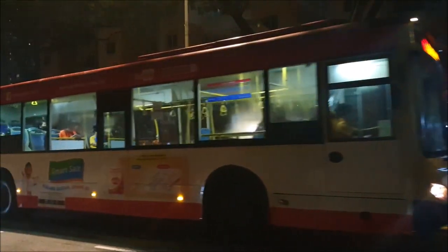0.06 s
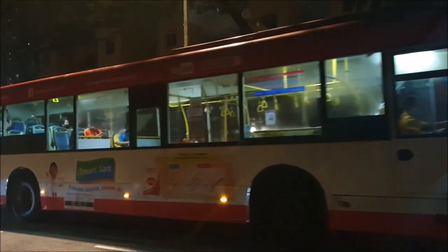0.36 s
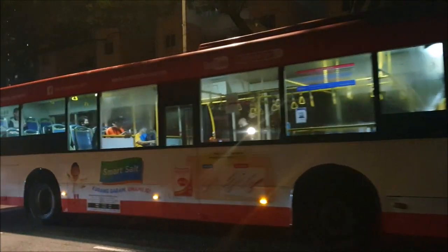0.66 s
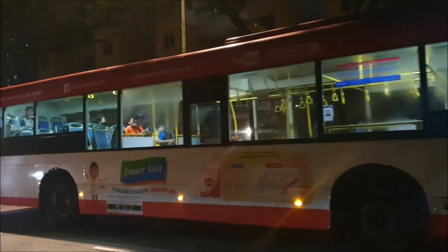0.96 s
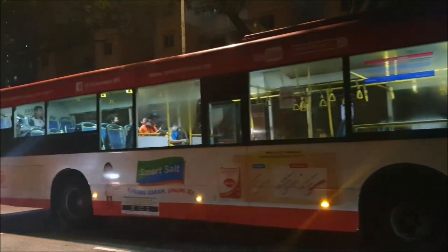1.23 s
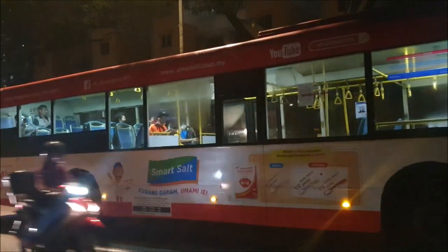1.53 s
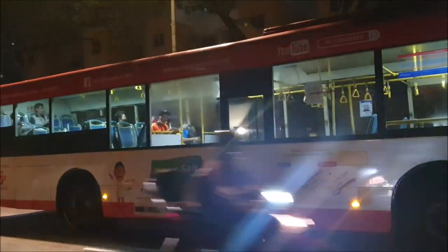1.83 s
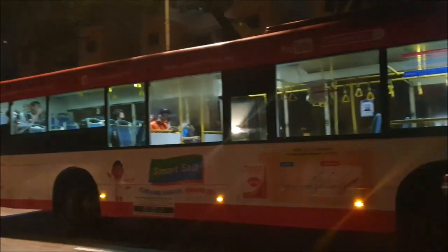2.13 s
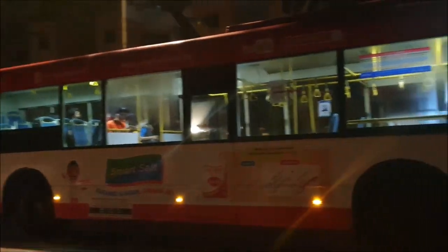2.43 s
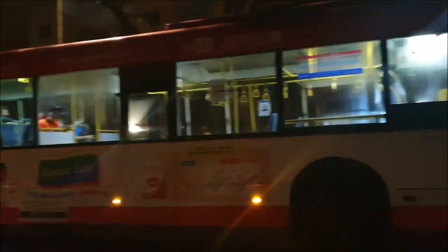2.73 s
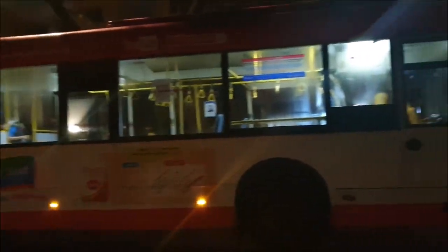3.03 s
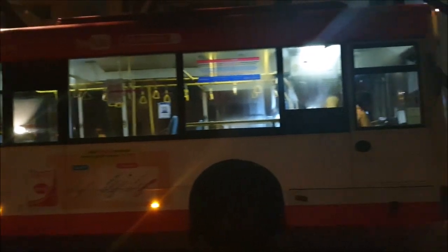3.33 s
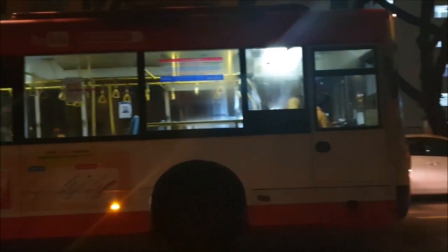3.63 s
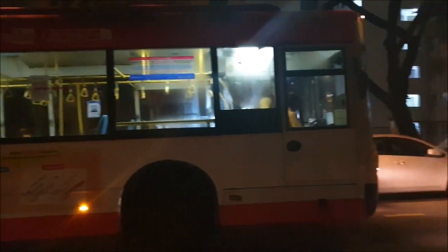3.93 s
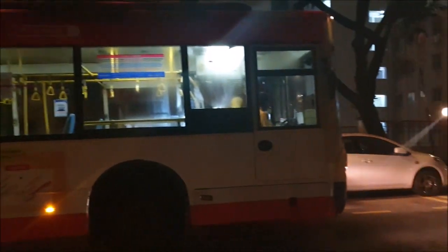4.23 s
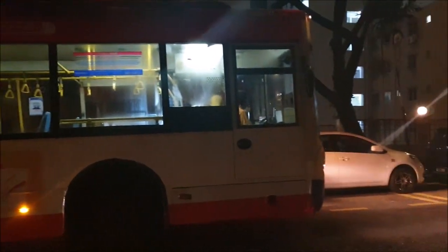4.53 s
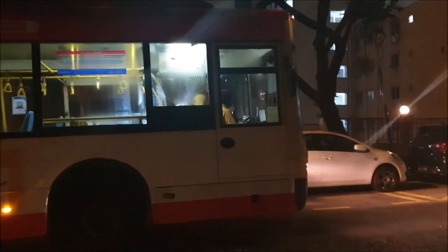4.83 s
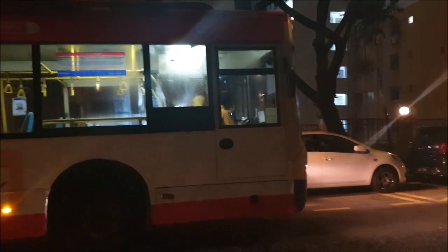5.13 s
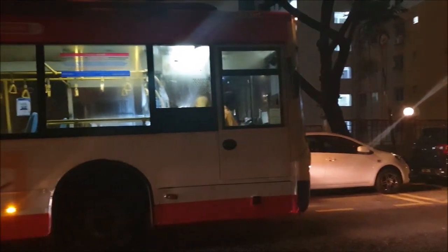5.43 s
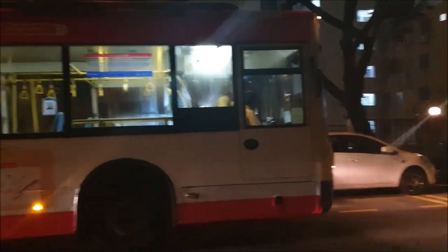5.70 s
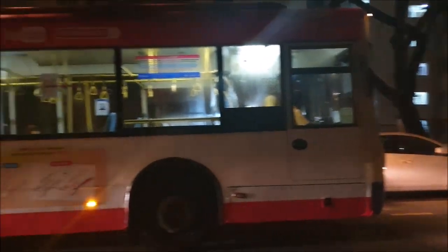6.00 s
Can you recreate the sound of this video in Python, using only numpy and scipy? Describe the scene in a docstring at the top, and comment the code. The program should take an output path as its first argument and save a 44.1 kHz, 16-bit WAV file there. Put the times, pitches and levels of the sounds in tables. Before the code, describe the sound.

A motorcycle thumps past left to right over an idling diesel bus, then the bus's air brakes let out a loud hiss.

```python
"""A low diesel rumble and a thumping motorcycle sound over the wash of night traffic.
A city bus creeps to a halt, its engine idling and its brakes singing faintly, while the motorcycle
passes left to right between it and the kerb: each firing thumps the exhaust, and the chain rattles.
Then the brakes blow off their air: one sharp puff and a longer hiss from under the floor.
House fronts and the side of the bus scatter the sound."""
import sys
import numpy as np
from scipy import signal
from scipy.fft import rfft, irfft
from scipy.io import wavfile

SR = 44100
rng = np.random.default_rng(int(sys.argv[2]) if len(sys.argv) > 2 else 0)


def unload_audio(sound):
    """Save the sound as a 16-bit wav file, at the path given as the first command line argument."""
    columns = np.transpose(np.atleast_2d(sound))
    # keep every value between -1 and 1, then stretch to whole-number steps
    steps = np.round(np.clip(columns, -1, 1) * 32767)
    wavfile.write(sys.argv[1], SR, steps.astype(np.int16))


N = 267246
TIME = np.arange(N) / SR
FREQ = np.fft.rfftfreq(N, 1 / SR)
SOUND_M_PER_S = 343
# the motorcycle rides a straight line and is nearest to the listener at PASSES_S
PASSES_S, BIKE_M_PER_S, NEAREST_M = 2.12, 6.33, 3.3
ALONG_M = BIKE_M_PER_S * (TIME - PASSES_S)  # negative on the left, positive on the right
DISTANCE_M = np.hypot(ALONG_M, NEAREST_M)


def undb(db):
    """Turn decibels into a gain to multiply by."""
    return 10 ** (np.asarray(db) / 20)


def unit(x):
    """Scale a signal to an average (rms) level of 1."""
    return x / np.sqrt(np.mean(x ** 2))


def curves(rows):
    """Join the rows of a table by straight lines in time, one curve per value column."""
    times_s, *columns = np.transpose(rows)
    return [np.interp(TIME, times_s, column) for column in columns]


def across(points):
    """Join (pitch_hz, value) points into a curve over all frequencies, on a log axis."""
    hz, value = np.transpose(points)
    return np.interp(np.log(FREQ + 1), np.log(hz + 1), value)


def colour(x, points):
    """Give a sound the tone outlined by (pitch_hz, level_db) points; the result has level 1."""
    cepstrum = irfft(np.log(undb(across(points))), N)
    # folding makes the filter ring after each hit, never before it
    fold = np.r_[1, np.full(N // 2 - 1, 2), np.zeros(N - N // 2)]
    response = np.exp(rfft(cepstrum * fold))
    return unit(irfft(rfft(x) * response, N))


def band(x, low_hz, high_hz):
    """Keep the part of a sound between two frequencies; the result has level 1."""
    response = 1 / (1 + (FREQ / high_hz) ** 24) - 1 / (1 + (FREQ / low_hz) ** 24)
    return unit(irfft(rfft(x) * response, N))


def ring(x, modes):
    """Let a sound ring an object whose resonances are rows of (pitch_hz, width_hz, level_db)."""
    response = sum(undb(db) * 1j * FREQ * width / (hz ** 2 - FREQ ** 2 + 1j * FREQ * width)
                   for hz, width, db in modes)
    return unit(irfft(rfft(x) * response, N))


def wander(rate_hz):
    """A smooth random wobble of size about 1, changing at up to about rate_hz."""
    return unit(irfft(rfft(rng.standard_normal(N)) / (1 + (FREQ / rate_hz) ** 4), N))


def shimmer(x, modes, rate_hz, depth_db):
    """Metal struck in ever different places: each resonance flickers on its own."""
    return unit(sum(ring(x, [(hz, width, 0)]) * undb(db + depth_db * wander(rate_hz))
                    for hz, width, db in modes))


def noise():
    """Stereo noise: left and right are alike in the bass, less so in the treble."""
    # how alike the two sides are: pitch_hz, likeness (0 to 1)
    likeness = [(60, 0.61), (150, 0.66), (300, 1), (640, 0.55), (1200, 0.53), (4000, 0.26), (15000, 0.074)]
    alike = np.clip(across(likeness), 0, 1)
    mid, side = rfft(rng.standard_normal((2, N)))
    mid, side = mid * np.sqrt(1 + alike), side * np.sqrt(1 - alike)
    return unit(irfft(np.array([mid + side, mid - side]), N))


def fade_out(start_s, end_s):
    """A gain that falls from 1 to 0."""
    return np.clip((end_s - TIME) / (end_s - start_s), 0, 1)


def fade_in(start_s, end_s):
    """A gain that rises from 0 to 1."""
    return 1 - fade_out(start_s, end_s)


def gush(start_s, rise_s, hold_s, fall_s):
    """A gain shaped like escaping air: it rises, holds, and dies as the pressure runs out."""
    falls_at_s = start_s + rise_s + hold_s
    return fade_in(start_s, start_s + rise_s) * fade_out(falls_at_s, falls_at_s + fall_s) ** 2.21


def delayed(x, late_s):
    """One channel heard late; a changing delay bends its pitch."""
    fine = signal.resample_poly(x, 4, 1)
    return np.interp(TIME - late_s, np.arange(4 * N) / (4 * SR), fine)


def arrive(x, left_lead_ms):
    """Sound from the side reaches one ear before the other."""
    left, right = np.broadcast_to(x, (2, N))
    return np.array([left, delayed(right, left_lead_ms / 1000)])


def scatter(x, tail_s, echo_db):
    """Mix a sound with its dense reflections, which fade by 60 dB in tail_s."""
    tail = noise() * undb(-60 * TIME / tail_s)
    tail = tail[:, :SR] / np.sqrt(np.sum(tail ** 2) / 2)
    echoes = signal.fftconvolve(np.atleast_2d(x), tail, axes=1)[:, :N]
    return (x + undb(echo_db) * echoes) / np.sqrt(1 + undb(2 * echo_db))


def firings(rate_hz, spread_db, jitter_s):
    """One uneven pulse per engine firing, and the phase (0 to 1) within each cycle."""
    cycles = np.cumsum(rate_hz) / SR
    starts = np.flatnonzero(np.diff(np.floor(cycles)))
    timing, strength = rng.standard_normal((256, 2))[:len(starts)].T
    starts = starts + (jitter_s * SR * timing).astype(int)
    pulses = np.zeros(N)
    pulses[np.clip(starts, 0, N - 1)] = undb(spread_db * strength)
    return pulses, cycles % 1


def street():
    """Traffic all around: a low rumble that wanders under a smooth far hiss."""
    # tone of distant traffic: pitch_hz, level_db
    traffic_tone = [(20, -12.5), (40, -0.5), (70, -2), (130, -4.5), (220, -5.5), (300, -10), (450, -8.5),
                    (530, -16), (830, -13.5), (1300, -19), (2600, -27.5), (6500, -35), (12000, -35),
                    (15800, -43)]
    wash = colour(noise(), traffic_tone)
    rumble = signal.sosfilt(signal.butter(2, 200, fs=SR, output="sos"), wash)
    swell_db = .6 * wander(5)
    return (wash + rumble * 0.23 * wander(22)) * undb(-44.5 + swell_db)


def ticks():
    """Loose metal parts tap and ring briefly."""
    # small metal taps: start_s, strength_db, pitch_hz, decay_s
    taps = [(2.1505, -35, 12500, 0.004), (2.186, -35, 10500, .004), (2.45, -36, 10660, .003),
            (2.484, -37, 12000, .004), (2.5444, -37, 10980, 0.0034), (5.8282, -40, 12600, 0.0098)]
    out = np.zeros((2, N))
    age = np.arange(SR // 10) / SR
    for start_s, db, hz, decay_s in taps:
        tap = 0.49 * rng.standard_normal((2, len(age))) + 0.18 * np.sin(2 * np.pi * hz * age)
        bright_tap = np.diff(tap * np.exp(-age / decay_s), prepend=0) / 2
        start = int(start_s * SR)
        out[:, start:start + len(age)] += undb(db) * bright_tap[:, :N - start]
    return out


def swish():
    """A short soft hiss swells ahead of the motorcycle."""
    # tone of the hiss: pitch_hz, level_db
    hiss_tone = [(900, -29), (1500, -6), (2100, 7.5), (3300, 3), (4500, -6), (8000, -2.5), (11000, 2),
                 (15000, -3)]
    swell = gush(1.117, rise_s=0.16, hold_s=0.12, fall_s=.24)
    left_right_db = np.array([[-45], [-41]])
    return colour(noise(), hiss_tone) * swell * undb(left_right_db)


def brake_squeal():
    """The brake linings sing thinly and unsteadily while the wheels still turn."""
    # squeals: start_s, end_s, pitch_hz, start_level_db, swell_db_per_s
    squeals = [(0, 0.65, 4590, -65, -16), (.15, 1.5, 14820, -72, 10)]
    edge_s = .12
    out = 0
    for start_s, end_s, hz, db, swell in squeals:
        pitch_hz = hz * (1 + .0006 * wander(40))
        tone = unit(np.sin(2 * np.pi * np.cumsum(pitch_hz) / SR))
        grip = fade_in(start_s, start_s + edge_s) * fade_out(end_s - edge_s, end_s)
        level_db = db + swell * (np.minimum(TIME, end_s) - start_s) + 1.5 * wander(15)
        out = out + tone * grip * undb(level_db)
    return scatter(out, tail_s=0.43, echo_db=2)


def bus_diesel():
    """The bus idles: lumpy firings boom through its body, with a light injector knock and sizzle."""
    # boom of the bus body: pitch_hz, level_db
    body_tone = [(18, -29), (30, 2), (43, -13), (60, 11), (90, 10), (120, -3.5), (160, -41), (190, -16),
                 (230, -1), (300, -9.5), (450, -20.5), (1000, -49)]
    idle_hz = 29.76
    pulses, phase = firings(idle_hz * (1 + .005 * wander(2)), spread_db=1.2, jitter_s=.0003)
    body = scatter(colour(pulses, body_tone), tail_s=.3, echo_db=-11)
    knock_modes = [(226.5, 8.6, -1.5), (430, 54, -22.0), (850, 300, -28), (1660, 440, -34.5)]
    knock = ring(noise() * np.exp(-phase / 0.067), knock_modes)
    spray = noise() * np.exp(-phase / 0.5) * undb(2 * wander(25))
    sizzle = colour(spray, [(3000, -17), (6500, 8.5), (8500, -9), (12000, 12.5), (15500, 2)])
    sizzle_db = -70.5 + 7.5 * fade_in(4.7, 6)  # louder once the bus stands
    return body * undb(-45) + knock * undb(-58.5) + sizzle * undb(sizzle_db)


def bus_rolling():
    """Tyres and panels rumble as the bus draws level, then die away as it halts."""
    rumble = colour(noise(), [(25, -9), (50, -2.5), (130, 0.5), (230, 3.5), (400, -9), (550, -16.5),
                              (860, -8.0), (1000, -12), (1400, -23), (2500, -38), (5000, -60)])
    return rumble * undb(-37.5) * fade_in(0, 0.74) * fade_out(0.38, 4.53)


def bearing():
    """Where the motorcycle is: -1 far left, 0 straight in front, 1 far right."""
    return ALONG_M / DISTANCE_M


def passing(level_db, coming_db, going_db):
    """Gain of one motorcycle part: it falls with distance and differs when coming and going."""
    side = bearing()
    aim_db = np.where(side < 0, coming_db, going_db) * side ** 2
    screen_db = -14.5 * fade_out(0, 0.65)  # traffic is in the way at first
    return undb(level_db + aim_db + screen_db) * NEAREST_M / DISTANCE_M


def road_echo(x):
    """Add the engine's bounce off the road, clearer from behind: the rasp climbs as it leaves."""
    engine_ahead_m, engine_gap_m, longest_detour_m = 0.84, 2.59, 0.377
    detour_m = longest_detour_m * engine_gap_m / np.hypot(ALONG_M + engine_ahead_m, engine_gap_m)
    echo = np.array([delayed(channel, detour_m / SOUND_M_PER_S) for channel in x])
    gain = undb(-12.5 + 3 * bearing())
    return (x + gain * echo) / np.sqrt(1 + gain ** 2)


def bus_side_echo(x):
    """The side of the bus mirrors the exhaust until the motorcycle has passed its front."""
    bus_gap_m = 1.617
    detour_m = np.hypot(ALONG_M, NEAREST_M + 2 * bus_gap_m) - DISTANCE_M
    echo = np.interp(TIME - detour_m / SOUND_M_PER_S, TIME, x)
    return echo * undb(-13) * fade_out(2.3, 2.6)


def chain_squeaks():
    """Dry links catch for a moment and chirp roughly."""
    # chirps: peak_s, level_db, pitch_hz, half_length_s
    chirps = [(1.15, -53, 9900, .05), (1.5, -53, 13330, .025), (1.74, -51, 13250, .03),
              (1.757, -51, 6400, 0.036), (1.768, -53, 4600, 0.05), (2.03, -53, 6260, .012),
              (2.296, -45, 6148, 0.012), (2.336, -44, 6070, 0.019), (2.373, -46, 6170, 0.02)]
    waver, grit = .015 * wander(300), undb(4 * wander(150))
    out = 0
    for peak_s, db, hz, half_length_s in chirps:
        swell = np.exp(-((TIME - peak_s) / half_length_s) ** 2)
        tone = np.sin(2 * np.pi * np.cumsum(hz * (1 + waver)) / SR)
        out = out + undb(db) * swell * tone
    return out * grit


def chain(phase):
    """Links strike the toothed wheels in gritty bunches; the ringing drops in pitch as it passes."""
    # rattle of the links: pitch_hz, level_db
    rattle_tone = [(2000, -19.5), (3000, -1.5), (4160, -1.5), (5050, -7.5), (6800, -1), (7600, -0.5),
                   (8630, -11), (9780, 4), (11500, 0), (13000, -4), (14600, -4), (15800, -8)]
    # resonances of the chain and its wheels: pitch_hz, width_hz, level_db
    chain_modes = [(4570, 180, -4), (6190, 160, -0.5), (7420, 390, -1), (9640, 200, -2), (11100, 140, -8),
                   (12100, 150, -0.5)]
    grit = undb(1.6 * wander(220))
    links = noise() * grit * unit(8.3 + np.exp(-phase / 0.11))
    rattle = colour(links, rattle_tone) * passing(-43.5, coming_db=-1.1, going_db=3.4)
    ringing = shimmer(links, chain_modes, rate_hz=25, depth_db=3.5)
    late_s = (DISTANCE_M - NEAREST_M) / SOUND_M_PER_S
    ringing = np.array([delayed(channel, late_s) for channel in ringing])
    return rattle + ringing * passing(-49, coming_db=-0.5, going_db=6)


def tappets(firing_hz):
    """The small parts that push the valves tick unevenly once a cycle and ring the valve cover."""
    # resonances of the valve cover: pitch_hz, width_hz, level_db
    cover_modes = [(7900, 820, -3), (10860, 700, 1), (11700, 900, -2), (13500, 1200, -3)]
    strokes, _ = firings(firing_hz, spread_db=2.5, jitter_s=.001)
    rise_s = 0.0044
    age = TIME[:SR // 20] / rise_s
    taps = signal.fftconvolve(strokes, age * np.exp(-age))[:N]
    ringing = shimmer(noise() * taps, cover_modes, rate_hz=30, depth_db=3)
    return ringing * passing(-49.5, coming_db=-16, going_db=3.7)


def clatter(surge):
    """Firings shake the engine; from behind, its casing rasps higher."""
    # tone of the shaking engine: pitch_hz, level_db
    engine_tone = [(240, -20.5), (400, 2), (515, -5.5), (693, -2.5), (951, -3.5), (1250, -8), (1420, -4),
                   (1600, -8.5), (1830, -6.5), (2950, -16), (5000, -18), (6500, -31), (11000, -120)]
    shake = noise() * surge * undb(0.96 * wander(35))
    engine = colour(shake, engine_tone) * passing(-41, coming_db=3.85, going_db=-0.81)
    casing = ring(shake, [(1075, 220, 4.5), (1383, 140, 3), (1790, 910, -0.5), (2230, 130, -5)])
    casing *= passing(-42, coming_db=-14, going_db=1.3)
    # the open side of the engine sweeps past
    flare_db = 2.5 * gush(1.81, rise_s=.08, hold_s=0.054, fall_s=0.34)
    return road_echo(engine + casing) * undb(flare_db)


def exhaust(pulses, surge, firing_hz):
    """Each firing thumps, rings pipe and silencer and leaves a puff; from behind it pops, then blurs."""
    # tones of the pipe's hum, boom, bark and sharp pop: pitch_hz, level_db
    hum_tone = [(60, -73.5), (92, -24), (112, 5), (128, -7.5), (150, -2.5), (250, -53)]
    boom_tone = [(60, -64.5), (90, -16), (120, -46.5), (142, 5), (165, 1.5), (182, -0.5), (212, -9),
                 (260, -15.5), (500, -69.5)]
    bark_tone = [(90, -29.5), (170, -20.5), (212, 6.5), (242, 1), (270, -6), (300, 2), (400, -16),
                 (600, -16), (1500, -59.5)]
    pop_tone = [(20, -27), (30, -8), (60, 3.5), (90, 2), (122, -5), (150, -1), (180, 1), (210, -8.5),
                (240, -4.5), (300, -7), (360, -16.5), (450, -21.5), (1000, -47)]
    # rise and fall of the deep thud near 60 Hz and the note near 90 Hz: time_s, level_db
    thud_levels = [(0.0, -54), (0.03, -46.5), (0.73, -36.5), (1.05, -50), (1.12, -37), (1.43, -40),
                   (1.64, -58), (2.12, -34), (2.62, -35.5), (2.81, -39.5), (2.87, -44), (3.86, -61),
                   (3.9, -61)]
    note_levels = [(0.0, -58), (0.39, -43.5), (1.68, -37), (2.07, -31), (2.65, -35.5), (3.03, -36),
                   (3.1, -43.5), (3.17, -35.5), (3.62, -45), (3.9, -66)]
    beat = colour(-pulses, pop_tone)
    thud = band(beat, 20, 74) * undb(curves(thud_levels)[0])
    note = band(beat, 74, 106) * undb(curves(note_levels)[0])
    thump = (thud + note) * undb(-0.5)

    over_cruise_hz = np.maximum(firing_hz - 31.4, 0)  # above cruising speed, pop gives way to boom
    facing = fade_in(2.05, 2.43)  # once past, the tailpipe faces the kerb: pops replace the drone
    hum = colour(-pulses, hum_tone) * passing(-36.5, coming_db=-0.78, going_db=-9)
    boom = colour(-pulses, boom_tone) * passing(-30.5, coming_db=-2.5, going_db=-13)
    bark = colour(-pulses, bark_tone) * passing(-45, coming_db=6.7, going_db=12.4)
    drone = (hum + boom * undb(9 * over_cruise_hz) + bark) * undb(-8.5 * facing)
    pop = band(beat, 106, 2000) * passing(-32.5, coming_db=0, going_db=-1.5) * facing
    pop *= undb(-3.5 * over_cruise_hz - 3 * fade_in(2.62, 2.8))  # also softer further off
    puff = colour(noise() * surge, bark_tone) * passing(-46, coming_db=9.3, going_db=4.2)

    echo_db = np.minimum(-17 + 3 * np.maximum(ALONG_M, 0), -4.5)  # more street echo once past
    blurred = scatter(drone + bus_side_echo(drone) + pop + puff, tail_s=.3, echo_db=echo_db)
    return (thump + blurred) * fade_out(3.82, 4)  # the throttle shuts


def motorcycle():
    """A single cylinder drives exhaust, clatter, tappets and chain as it passes left to right."""
    # engine speed: time_s, firing_hz
    engine_speed = [(0.0, 28.88), (0.95, 28.55), (1.29, 28.22), (1.7, 29.27), (2.19, 29.95), (2.47, 29.93),
                    (3.04, 31.45), (3.9, 33.75)]
    firing_hz = curves(engine_speed)[0]
    pulses, phase = firings(firing_hz, spread_db=.9, jitter_s=.00015)
    surge = unit(3.7 + np.exp(-phase / 0.018))  # a brief lift in level at each firing
    engine = clatter(surge)
    pan_db = -3.5 - 3.5 * bearing()  # left minus right
    metal = (chain(phase) + tappets(firing_hz)) * undb(np.array([pan_db, -pan_db]) / 2)
    machinery = (engine + metal) * fade_out(2.836, 3.6)  # hidden as it rides away
    bike = exhaust(pulses, surge, firing_hz) + machinery + chain_squeaks()
    return arrive(bike, left_lead_ms=-0.14 - 0.43 * bearing())


def vent_whistle():
    """Rushing air whistles hoarsely at the mouth of the vent pipe, sinking as it blows."""
    pitch_hz, width_hz = 2400 - 71 * fade_in(3.55, 3.8), 130
    angle = 2 * np.pi * np.cumsum(pitch_hz) / SR
    hoarse = unit(wander(width_hz) * np.cos(angle) + wander(width_hz) * np.sin(angle))
    flare_db = 5.5 * gush(3.75, rise_s=.03, hold_s=0.043, fall_s=0.14)  # at the height of the venting
    return hoarse * fade_out(3.9, 7.95) * undb(-13.5 + flare_db)


def air_brake():
    """Escaping air: a bright jet and a roar that rings first the valve, then the vent pipe."""
    # bursts of air: start_s, rise_s, hold_s, fall_s, jet_db, roar_db
    releases = [(2.897, 0.047, 0.29, 0.43, -39.5, -45), (2.991, 0.076, 0.029, 0.2, -19.5, -29),
                (3.151, 0.23, 0.47, 0.85, -27.5, -36), (3.544, 0.19, 0.043, 0.37, -28, -31)]
    # tones of the jet and the roar: pitch_hz, level_db
    jet_tone = [(4000, -24), (7000, -2.5), (8800, -4), (10500, 6), (13200, 5), (15800, 3)]
    roar_tone = [(250, -12.5), (550, -8.5), (880, -2.5), (1150, -7.5), (1350, -10), (1600, -6),
                 (1850, -7.5), (2200, -5), (2900, -2), (4500, -2), (5500, 0.5), (7300, -3.5), (9000, -10),
                 (14000, -28)]
    # resonances of the valve and the vent pipe: pitch_hz, width_hz, level_db
    valve_modes = [(4070, 160, -2), (4800, 66, -7), (6060, 67, -2.5), (7130, 180, -3), (13200, 160, -1.5)]
    pipe_modes = [(2183, 72, -2.5), (2830, 43, -1.5), (3580, 160, 0), (3940, 130, -14), (4920, 130, -10),
                  (5390, 130, -7), (7040, 79, -12), (7600, 57, 1), (8360, 70, -12), (13300, 140, -3)]
    # the right ear is shaded from air that escapes low on the left: pitch_hz, gain_db
    right_shade = [(1000, 0.5), (2400, 0), (6500, -1.5), (8300, 0), (10500, 2), (12000, -2), (13500, -5),
                   (15500, -9)]
    jet_power = roar_power = 0
    for *timing, jet_db, roar_db in releases:
        flow = gush(*timing)
        jet_power += (flow * undb(jet_db)) ** 2
        roar_power += (flow * undb(roar_db)) ** 2
    flutter = undb(0.58 * wander(29))
    valve_opens = gush(2.995, rise_s=0.031, hold_s=0.064, fall_s=0.3)
    valve = ring(noise(), valve_modes) * valve_opens * undb(-32.5)
    pipe = (ring(noise(), pipe_modes) * undb(-7.5) + vent_whistle()) * fade_in(3.07, 3.26)
    jet = colour(noise(), jet_tone) * np.sqrt(jet_power)
    roar = (colour(noise(), roar_tone) + pipe) * np.sqrt(roar_power)
    # close reflections under the floor colour the hiss
    left, right = scatter((jet + roar + valve) * flutter, tail_s=.13, echo_db=-6)
    return np.array([left, irfft(rfft(right) * undb(across(right_shade)), N)])


def scene():
    """Everything in the street; the bus's engine and valves lie to the left."""
    rumble = arrive(bus_diesel() + bus_rolling() + street(), left_lead_ms=0.418)
    brakes = arrive(air_brake() + brake_squeal(), left_lead_ms=0.322)
    return rumble + brakes + motorcycle() + swish() + ticks()


def record(dry):
    """The right side is shaded, quieter and duller than the left; the highest treble is cut."""
    # balance of the two sides: pitch_hz, left_minus_right_db
    balance = [(60, 5.8), (200, 6.7), (380, 7), (700, 9), (1300, 9.3), (2400, 10.4), (4400, 12), (6500, 14),
               (7600, 17), (8300, 23.8), (9000, 9.5), (10100, 2), (11500, 7), (15000, 10)]
    top_hz = 15740
    right = undb(-across(balance))
    gains = np.array([np.ones_like(right), right]) * 2 / (1 + right)
    heard = irfft(rfft(dry) * gains, N)
    return signal.sosfilt(signal.ellip(12, .2, 80, top_hz, fs=SR, output="sos"), heard)


dry = scene()
out = record(dry)
unload_audio(out)
```